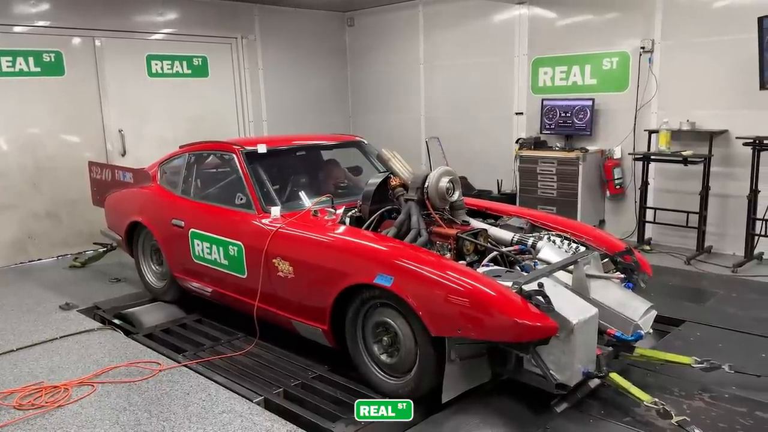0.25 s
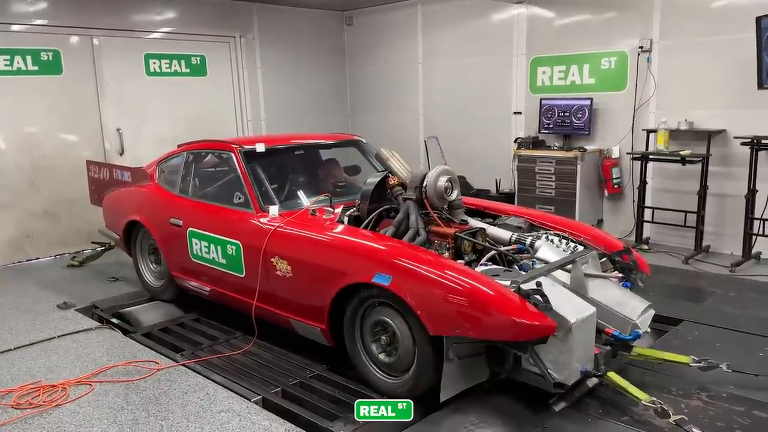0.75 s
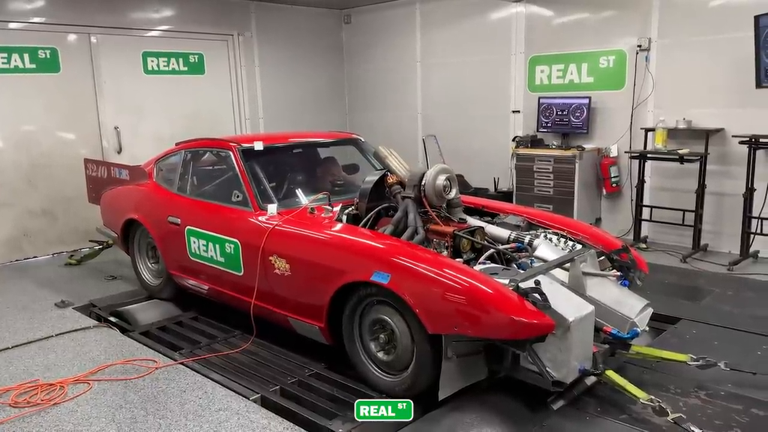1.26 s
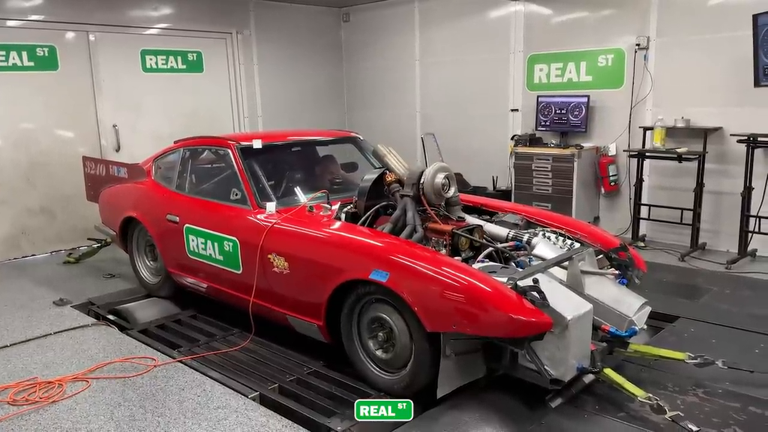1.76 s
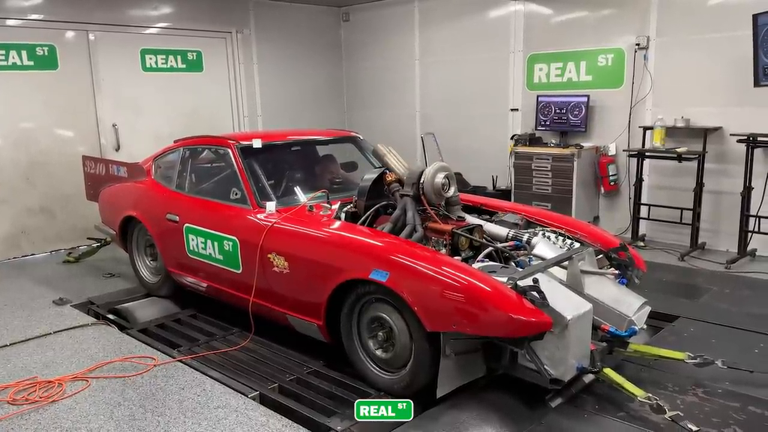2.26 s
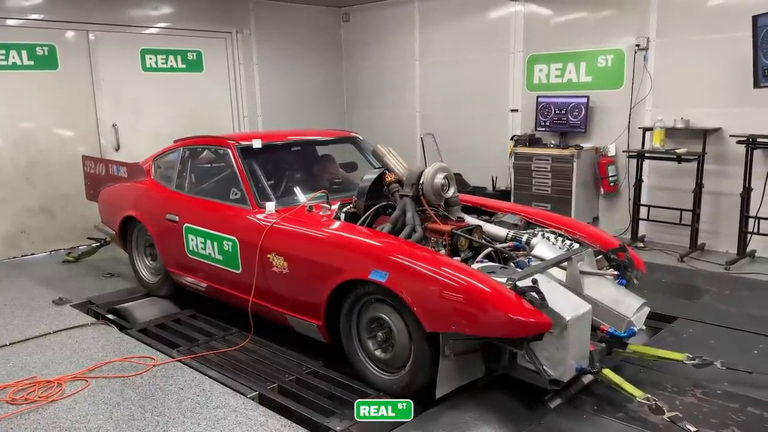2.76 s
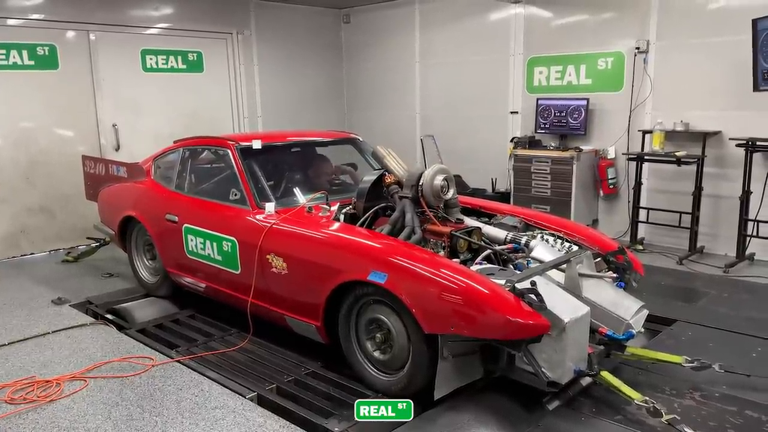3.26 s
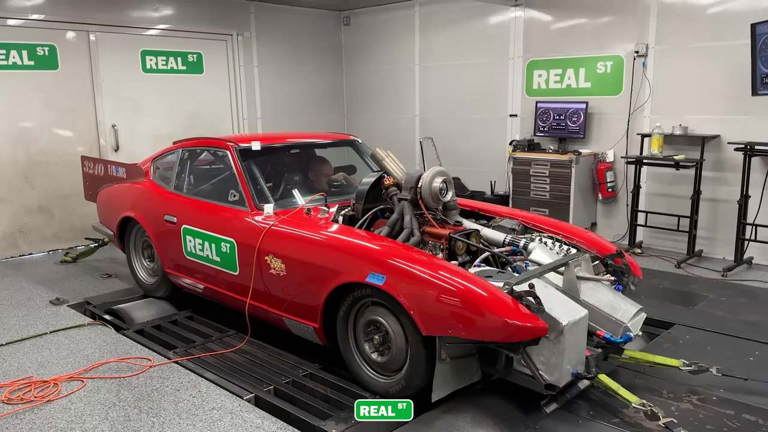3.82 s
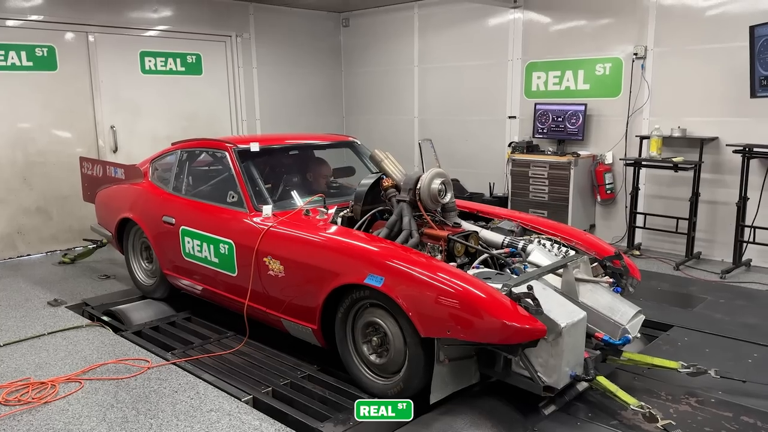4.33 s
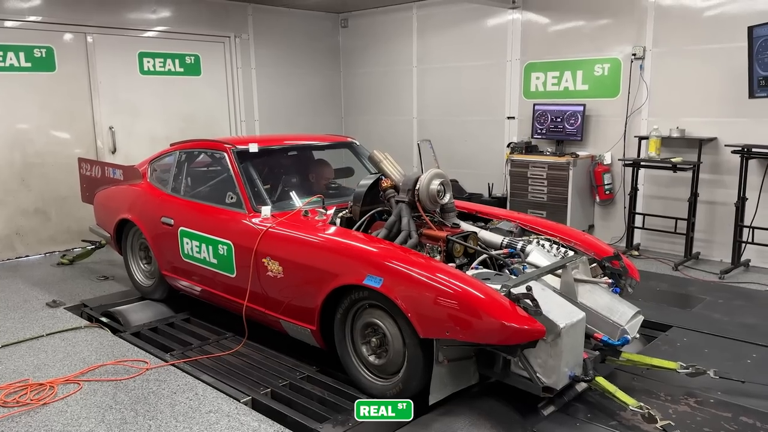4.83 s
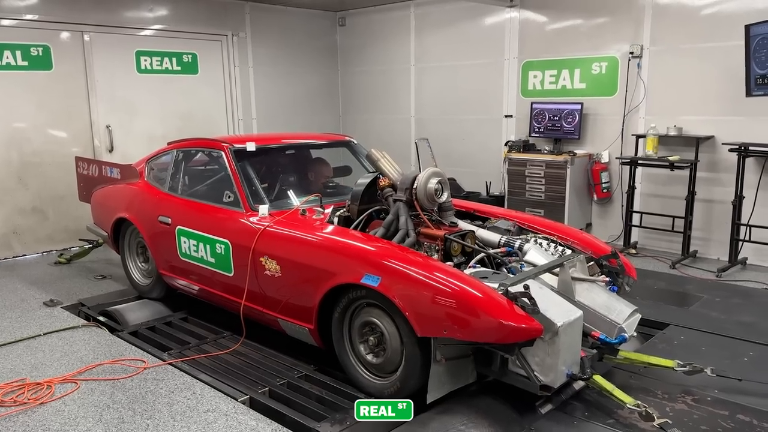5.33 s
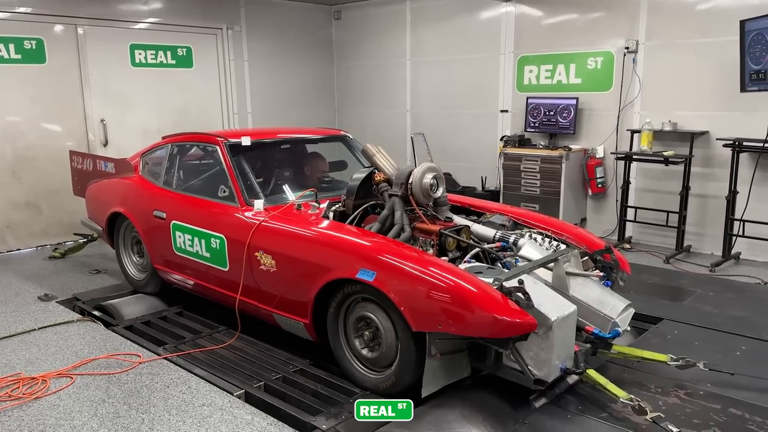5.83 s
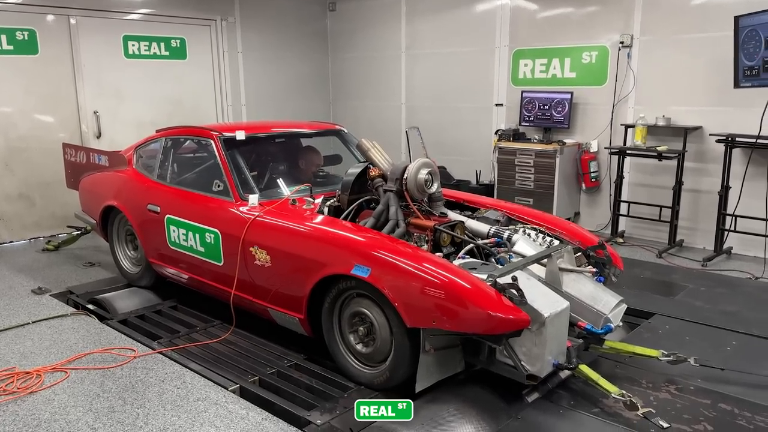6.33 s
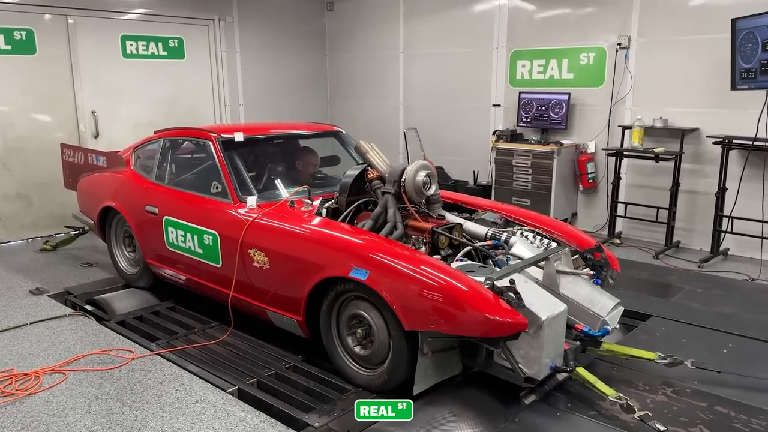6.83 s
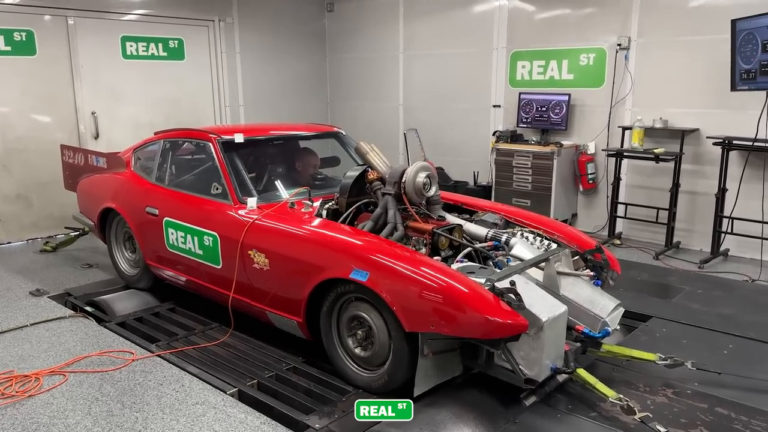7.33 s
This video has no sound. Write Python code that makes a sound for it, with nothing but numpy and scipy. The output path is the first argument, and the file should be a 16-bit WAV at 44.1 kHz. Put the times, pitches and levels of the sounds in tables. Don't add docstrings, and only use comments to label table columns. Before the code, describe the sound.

Close stereo sound of a car engine under load indoors. The low, even exhaust hum slides upward by more than half an octave, fast at first, then creeping to a steady hold. Rough gas rumble and roar surround it, with rushing intake and turbine air, faint breathy whistles and a sizzling clatter on top. The brightness is strongest at the start and softens toward the end; room resonances make the tone swell and dip.

```python
import sys
import numpy as np
from scipy import signal
from scipy.fft import rfft, irfft, next_fast_len
from scipy.io import wavfile
from scipy.ndimage import uniform_filter1d

SR = 44100
rng = np.random.default_rng(int(sys.argv[2]) if len(sys.argv) > 2 else 0)


def waveform_to_disk(signal):
    frames = np.transpose(np.atleast_2d(signal))
    scaled = np.clip(frames, -1, 1) * 32767
    samples = np.round(scaled).astype(np.int16)
    wavfile.write(sys.argv[1], SR, samples)


def to_linear_factor(level_db):
    exponent = np.asarray(level_db, float) / 20
    return 10 ** exponent


N = 334278

# f/Hz, width/Hz, strength [1 = full, negative = dip]
PIPE_RESONANCES = [(640, 20, .9), (705, 20, 1.3), (825, 15, 1.1), (865, 18, 1.1), (915, 15, 1.1),
                   (963, 15, 1.2), (1110, 30, .8), (1340, 50, .6), (3840, 80, .6), (4620, 100, .6),
                   (5450, 350, -.5), (7500, 150, -.5), (6650, 250, 1.3), (8100, 250, .8)]


def rms_one(x):
    return x / np.sqrt(np.mean(x ** 2) + 1e-20)


def in_time(rows):
    s, *columns = np.transpose(rows)
    return [np.interp(np.arange(N) / SR, s, c) for c in columns]


def at_hz(points, hz):
    point_hz, values = np.transpose(points)
    return np.interp(np.log(np.maximum(hz, 1)), np.log(point_hz), values)


def drift(rate):
    r = np.exp(-80 * np.pi * rate / SR)
    chance = rng.standard_normal(N // 40 + 2002)
    slow = signal.lfilter([1], [1, -2 * r, r * r], chance)[2000:]
    return np.interp(np.arange(N) / 40, np.arange(len(slow)), rms_one(slow))


def humps(rows, hz):
    return sum(height / (1 + 1j * (hz - centre_hz) / width_hz) for centre_hz, width_hz, height in rows)


def tone(multiple, cycle, cycle_hz, level_db, start):
    # f/Hz, width/Hz, level/dB
    swells = [(88.3, 5.8, 7), (100, 3.4, 5.5), (134.6, 3.3, 3.5), (170.9, 1.6, 2), (243.9, 13.2, 9),
              (276, 20.1, 17), (293.2, 5.1, 5.5), (312.3, 8, 7.5), (337, 5.1, 3.2), (406.6, 9.1, 5.5),
              (441.6, 7.3, 7.5), (461, 22, 6.5), (566.0, 9.8, 6.5), (605.5, 16, 9)]
    # f/Hz, width/Hz, level/dB
    nulls = [(96.1, 6.1, -7), (115.6, 1.8, -8.5), (123.8, 6.34, -9.5), (166.2, 5.5, -16.5), (206, 8.8, -9),
             (259.6, 2.4, -11.5), (266.1, 1.4, -5), (298, 0.83, -1), (356, 2.3, -1.5), (386.3, 5.2, -13),
             (440.6, 9.6, -5.5), (468, 2.7, -7), (655, 16.4, -6)]
    # f/Hz, left-right level/dB
    port_tilt = [(80, 3), (135, 2), (170, 10), (192, 1), (212, -4.5), (250, -3), (258, -6.5), (270, -1),
                 (290, -2), (320, -1.5), (377, 1.5), (400, 0.5), (480, -0.5), (550, 7.5)]
    hz = multiple * cycle_hz
    grid_hz = np.arange(10, 1500, .25)
    cell = humps(swells, grid_hz) + humps(nulls, grid_hz) + 9 * humps(PIPE_RESONANCES, grid_hz)
    cell_db = np.interp(hz, grid_hz, cell)
    level_db = level_db + cell_db.real
    start = start + cell_db.imag * np.log(10) / 20
    pan_db = at_hz(port_tilt, hz) / 2
    angle = 2 * np.pi * multiple * cycle + start
    lead = np.pi * hz * .00026
    left = to_linear_factor(pan_db) * np.cos(angle + lead)
    right = to_linear_factor(-pan_db) * np.cos(angle - lead)
    return np.sqrt(2) * to_linear_factor(level_db) * np.array([left, right])


def exhaust(cycle, cycle_hz, effort_db):
    # multiple of the cycle rate, level/dB at mean effort, share of the effort's swing
    firing = [
        (6, -17.5, 0.25),
        (12, -32.5, 1.48),
        (18, -32.5, 0.41),
        (24, -40.5, 0.64),
    ]
    # multiple of the cycle rate, level/dB, share of the effort's swing
    uneven = [(2, -58.5, -.2), (3, -46.5, -.1), (4, -47, -.5), (5, -48, 0), (7, -49, .3), (8, -43.5, .35),
              (9, -47, 2.2), (10, -44.5, -.15), (11, -54.5, .8), (13, -58, -.1), (14, -43.5, -1.3),
              (16, -44, -.6), (19, -58, .3), (20, -51, .9), (21, -54, .3), (22, -50, .4), (26, -60, .2),
              (28, -56, -.4), (30, -51.5, 1.6), (32, -57.5, .1), (34, -57, .5), (36, -54, .8),
              (38, -56.5, .15), (40, -55.5, .2), (42, -52.5, .4), (44, -56.5, .4), (46, -55.5, .3),
              (48, -56.5, .9), (54, -58, .9), (60, -60.5, 1)]
    # f/Hz, width/Hz, level/dB
    branch_null = [(510.5, 9.2, -16)]
    pipe_spread = 1.6e-4
    coarse = 8
    few = slice(None, None, coarse)
    cycle, cycle_hz, effort_db = cycle[few], cycle_hz[few], effort_db[few]
    out = 0
    for k, (multiple, level_db, follows) in enumerate(firing):
        order = round(multiple)
        hz = order * cycle_hz
        gain_db = level_db + follows * effort_db + humps(branch_null, hz).real + .15 * drift(4)[few]
        out = out + tone(order, cycle, cycle_hz, gain_db, .5 * k ** 3 + pipe_spread * hz ** 2)
    for multiple, level_db, follows in uneven:
        loose = multiple / 14
        gain_db = -1 + level_db + follows * effort_db + .6 * loose * drift(2)[few]
        start = rng.uniform(0, 2 * np.pi) + .15 * loose * drift(4)[few]
        out = out + tone(multiple, cycle, cycle_hz, gain_db, start)
    return signal.resample_poly(out, coarse, 1, axis=1, padtype="line")[:, :N]


def gas_noise(spectrum, envelope):
    # f/Hz, left-right level/dB
    balance = [(60, -7), (250, -1), (600, -0.5), (950, 1), (1500, -1), (2200, -4), (3200, -2.5), (4300, -2),
               (5200, -0.5), (6400, 4), (7000, -12), (7600, -3.5), (9500, -6.5), (11000, 0)]
    # f/Hz, likeness [0-1]
    likeness = [(60, .97), (400, .95), (900, .88), (1400, .65), (2100, .4), (3300, .62), (4900, .3),
                (6000, .4), (6600, .72), (7600, .4), (8200, .58), (9200, .4), (10500, .1)]
    # f/Hz, phase/rad
    scatter = [(300, .4), (700, 1.2), (1200, 1.6), (1350, .5), (2000, 2.6), (2400, .3), (2900, .2),
               (3150, 1.8), (3900, -.5), (4500, .3), (5000, -1.1), (5800, -.3), (7400, -2.1), (7700, .8)]
    size = next_fast_len(N + SR // 4)
    hz = np.fft.rfftfreq(size, 1 / SR)
    shared, left, right = rfft(rng.standard_normal((3, N)) * envelope, size)
    colour = to_linear_factor(at_hz(spectrum, hz)) * to_linear_factor(5.5 * humps(PIPE_RESONANCES, hz).real)
    alike = np.clip(at_hz(likeness, hz), 0, 1)
    path_delay_s = .00044
    turn = at_hz(scatter, hz) * np.minimum(hz / 300, 1)
    late = np.exp(-2j * np.pi * hz * path_delay_s + 1j * turn)
    together = np.sqrt(alike) * shared * np.array([late ** 0, late])
    ports = together + np.sqrt(1 - alike) * np.array([left, right])
    t60_s, echo_db = .15, -9
    t = np.arange(SR // 4) / SR
    echoes = rng.standard_normal(len(t)) * to_linear_factor(-60 * t / t60_s) * (t > .004)
    walls = 1 + to_linear_factor(echo_db) * rfft(echoes / np.linalg.norm(echoes), size)
    pan = to_linear_factor(at_hz(balance, hz) / 2 * np.array([[1], [-1]]))
    out = irfft(ports * colour * walls * pan, size)[:, :N]
    return out / np.std(out.mean(axis=0))


def exhaust_rumble(turns_db, effort_db):
    # f/Hz, level/dB per Hz
    low_colour = [(12, -20), (28, -33), (50, -3), (90, -1.5), (150, -1.5), (190, -7), (260, 4), (350, 0),
                  (450, -21), (600, -21), (900, -53)]
    return to_linear_factor(-36.5 + .03 * effort_db) * gas_noise(low_colour, to_linear_factor(1.4 * turns_db))


def exhaust_roar(firings_db, turns_db, effort_db):
    # f/Hz, level/dB per Hz
    roar_colour = [(200, -40), (400, -10.5), (550, -11), (650, -7.5), (770, -8.5), (900, -4), (1000, -4.5),
                   (1150, -6), (1450, -12.5), (2200, -14), (4000, -34)]
    puffs = to_linear_factor(1.2 * firings_db + 1.0 * turns_db + .5 * drift(15))
    gain = np.hypot(to_linear_factor(-38 + 1.2 * effort_db), to_linear_factor(-36))
    return gain * gas_noise(roar_colour, puffs)


def whistle(rows, spread):
    hz, level_db = in_time(rows)
    angle = 2 * np.pi * np.cumsum(hz) / SR
    both, left, right = [rms_one(drift(spread) * np.cos(angle) + drift(spread) * np.sin(angle))
                         for wave in range(3)]
    return to_linear_factor(level_db) * np.array([.6 * both + .6 * left, .9 * both + .9 * right])


def turbine_hiss(firings_db, turns_db, effort_db):
    # f/Hz, level/dB per Hz
    hiss_colour = [(800, -31), (1300, 9), (1600, 6.5), (2150, 2.5), (2700, 4), (3500, 4), (4300, -1.5),
                   (5400, 0), (6200, -5), (7500, -6), (8500, -1.5), (9500, -17), (12000, -16.5)]
    # t/s, f/Hz, level/dB against the hiss
    high_whistle = [(0, 3180, -9.5), (2, 3170, -9.5), (2.6, 3280, -9.5), (5.5, 3280, -10), (6.5, 3290, -14),
                    (7.58, 3290, -18)]
    low_whistle = [(0, 2560, -12), (1.8, 2520, -12), (2.6, 2420, -12), (5.8, 2420, -12), (6.5, 2300, -19),
                   (7.58, 2150, -17)]
    puffs = to_linear_factor(.8 * firings_db + .5 * turns_db + .5 * drift(150) + .65 * drift(6))
    air = gas_noise(hiss_colour, puffs)
    air = air + whistle(high_whistle, spread=40) + whistle(low_whistle, spread=90)
    return to_linear_factor(-35 + effort_db) * air


def valve_ticks(per_s):
    sizes = rng.exponential(1, N) * (rng.random(N) < per_s / SR)
    return signal.lfilter([1], [1, -np.exp(-500 / SR)], sizes + 1e-18)


def valve_sizzle(firings_db, effort_db):
    # f/Hz, level/dB per Hz
    bright_colour = [(4000, -19), (6000, -6), (8000, 0.5), (9600, -2), (11000, -2.5), (12200, -9.5),
                     (14000, -6.5), (15000, -11), (15700, -8), (17000, -20)]
    puffs = to_linear_factor(.8 * firings_db + .7 * drift(90) + 1.1 * drift(5))
    return to_linear_factor(-40.5 + 1.53 * effort_db) * gas_noise(bright_colour, puffs + .45 * valve_ticks(45))


def scene():
    # t/s, firing f/Hz
    speed = [(0.0, 83.22), (0.2, 88.25), (0.4, 93.0), (0.6, 97.67), (0.8, 102.17), (1.0, 106.37),
             (1.2, 110.18), (1.4, 113.55), (1.6, 116.51), (1.8, 119.09), (2.0, 121.35), (2.33, 124.51),
             (2.66, 127.07), (2.99, 129.11), (3.4, 131.0), (4.0, 132.74), (5.2, 135.63), (6.2, 137.3),
             (7.58, 138.5)]
    # t/s, level/dB around the mean
    effort = [(0.0, 9.0), (0.3, 6.5), (0.65, 5.5), (0.9, 5.5), (1.3, 4.5), (1.7, 2.5), (2.2, 0), (2.7, 0),
              (3.3, -2.0), (4.2, -2.5), (4.9, -2), (5.7, -3.0), (6.5, -5), (7.58, -5.5)]
    firing_hz, = in_time(speed)
    effort_db, = in_time(effort)
    cycle_hz = uniform_filter1d(firing_hz, size=SR // 5, mode="nearest") / 6
    cycle = np.cumsum(cycle_hz * (1 + 0.00031 * drift(6.7))) / SR
    firings_db = np.cos(12 * np.pi * cycle)
    turns_db = 1.2 * np.cos(4 * np.pi * cycle) + .7 * np.cos(2 * np.pi * cycle)
    tones = exhaust(cycle, cycle_hz, effort_db)
    rumble = exhaust_rumble(turns_db, effort_db)
    roar = exhaust_roar(firings_db, turns_db, effort_db)
    hiss = turbine_hiss(firings_db, turns_db, effort_db)
    sizzle = valve_sizzle(firings_db, effort_db)
    return tones + rumble + roar + hiss + sizzle


def band_limit(x):
    return signal.sosfilt(signal.butter(12, 15800, fs=SR, output="sos"), x)


def record(dry):
    left, right = 1.57 * np.tanh(dry / 1.462)
    hz = np.fft.rfftfreq(N, 1 / SR)
    width = np.where(hz < 10700, 1, np.where(hz < 13800, 0, to_linear_factor(-1.5)))
    side = irfft(rfft(left - right) * width, N) / 2
    mid = (left + right) / 2
    return band_limit(np.array([mid + side, mid - side]))


dry = scene()
out = record(dry)
waveform_to_disk(out)
```